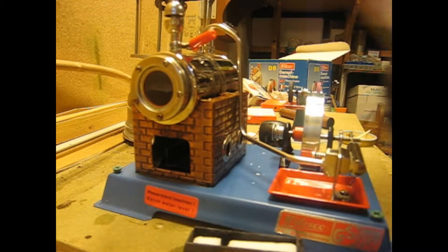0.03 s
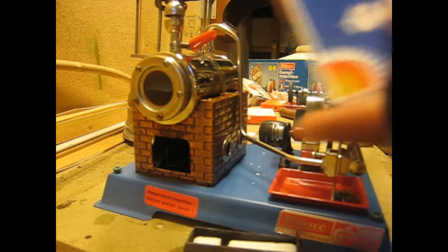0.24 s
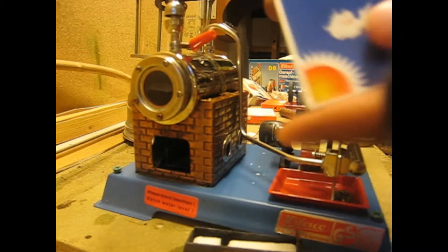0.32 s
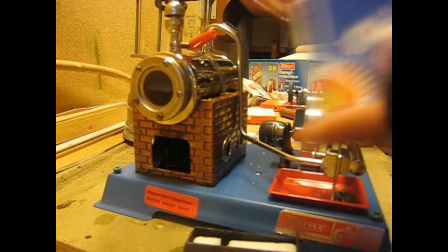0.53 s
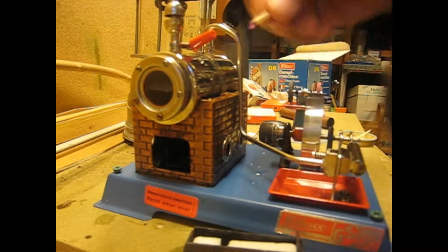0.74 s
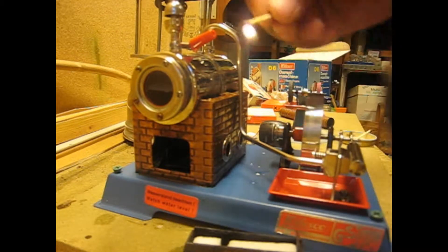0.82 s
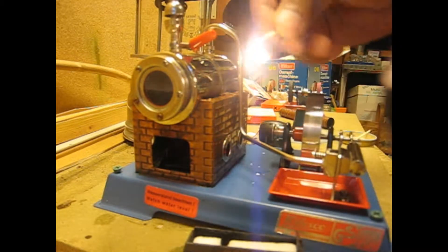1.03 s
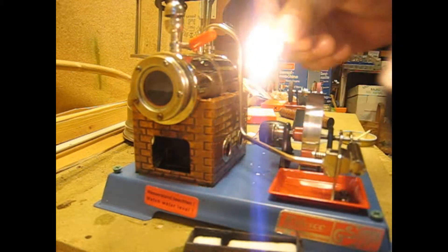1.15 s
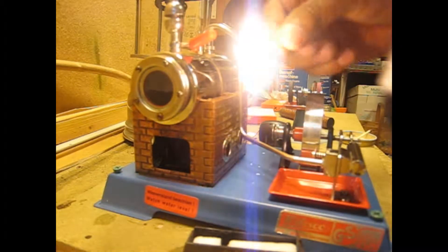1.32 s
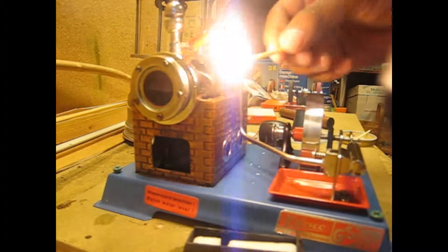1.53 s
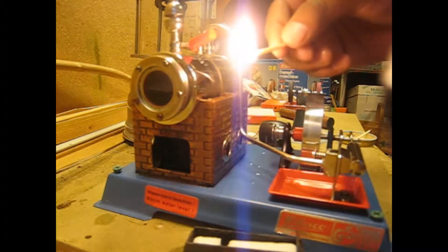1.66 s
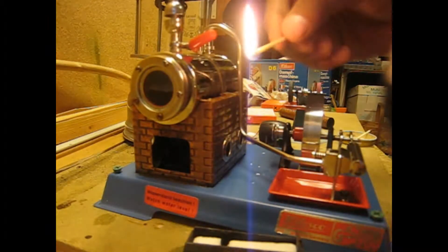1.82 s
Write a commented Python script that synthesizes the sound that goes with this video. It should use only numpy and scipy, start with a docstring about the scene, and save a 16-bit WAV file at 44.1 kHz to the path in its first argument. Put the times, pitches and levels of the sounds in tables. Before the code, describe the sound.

Match lighting in a small quiet room, heard close and lo-fi: clicking matchbox handling, one abrupt scratch with a woody knock, soft fizzing flare, then a brief rattling drag ending in a loud clack.

```python
"""A match is struck on a box held close to a small camera: its head rasps on grit and the hollow box booms.
Fingers and matches rub and click the box, then the head crackles and pops alight: rubs and some crackles are
random stick-slip kicks, clicks, other crackles and the pop single blows, all through the box's resonances.
The flame, filtered noise with small crackles, hisses and roars; meanwhile the box is dragged over the bench.
A short echo and the room's hush surround this. The camera keeps 8-bit sound at a quarter of the playing rate."""
import sys
import numpy as np
from scipy import signal
from scipy.fft import rfft, irfft, next_fast_len
from scipy.io import wavfile
from scipy.ndimage import map_coordinates

SR = 44100
rng = np.random.default_rng(int(sys.argv[2]) if len(sys.argv) > 2 else 0)


def rack_gain(trim_db):
    """Turn a fader trim in dB into the linear factor to multiply a signal by."""
    fader = np.asarray(trim_db, float)
    return 10 ** (fader / 20)


def store_wav(level_fs):
    """Save 16-bit WAV to argv[1]."""
    pcm = np.round(np.clip(np.atleast_2d(level_fs), -1, 1) * 32767)
    wavfile.write(sys.argv[1], SR, pcm.T.astype(np.int16))


N = 83790  # length in samples


def unit(x):
    """Normalisation: scales a signal to rms 1."""
    return x / np.sqrt(np.mean(x ** 2) + 1e-20)


def along(points, hz):
    """Spectral envelope: gain interpolated in dB over log frequency."""
    freq_hz, gain_db = np.transpose(points)
    return rack_gain(np.interp(np.log(hz + 1), np.log(freq_hz + 1), gain_db))


def levels(rows):
    """Amplitude envelope: one gain per sample for each dB column, down at -120 dB outside the table."""
    time_s, *columns = np.transpose(rows)
    now_s = np.arange(N) / SR
    return [rack_gain(np.interp(now_s, time_s, column, -120, -120)) for column in columns]


def wobble(knots_per_s):
    """Slow random modulation: a smooth curve through random knots."""
    knots = rng.standard_normal(int(N * knots_per_s / SR) + 4)
    return map_coordinates(knots, [np.arange(N) * knots_per_s / SR])


def filtered(x, response):
    """Linear filtering: the spectrum times a response of frequency."""
    size = next_fast_len(len(x) + 8192)
    return irfft(rfft(x, size) * response(np.fft.rfftfreq(size, 1 / SR)), size)[:len(x)]


def shaped_noise(points):
    """Broadband noise: white noise under a spectral envelope, rms 1."""
    return unit(filtered(rng.standard_normal(N), lambda f: along(points, f)))


def body(peaks, favoured_hz=1, octaves=np.inf):
    """Modal resonance: damped modes of alternating sign, strongest near the favoured pitch."""
    def response(f):
        total = 0
        for k, (centre, width, db) in enumerate(peaks):
            nearness = np.exp(-.5 * (np.log2(centre / favoured_hz) / octaves) ** 2)
            mode = 1j * f * width / (centre * centre - f * f + 1j * f * width)
            total = total + (-1) ** k * rack_gain(db) * nearness * mode
        return total
    return response


def slips(size, per_s, spread_db):
    """Stick-slip friction: tiny kicks at random moments with uneven but bounded strength."""
    kicks = rng.uniform(-1, 1, size) * (rng.random(size) < per_s / SR)
    return kicks * rack_gain(spread_db * np.minimum(rng.exponential(size=size), 3))


def add(out, start_s, piece):
    """Superposition: mixes a piece in at its start time."""
    at = max(round(start_s * SR), 0)
    out[at:at + len(piece)] += piece[:len(out) - at]


def blow(response, peak_db, hz):
    """Impulse excitation: one soft-edged contact, shorter at higher pitch, rings a body."""
    contact = np.hanning(int(0.19 * SR / hz) + 3)  # 0.19 cycles long, plus edges
    ring = filtered(np.pad(-contact, (0, SR // 20)), response)
    return rack_gain(peak_db) * ring / np.abs(ring).max()


# spectrum of the room's hush: freq_hz [Hz], gain_db [dB]
ROOM_SPECTRUM = [(20, -8.5), (60, -5.5), (150, -7.5), (400, -17), (1500, -27), (5500, -31.5)]


def room_hush():
    """Stationary ambient noise: a steady random hush with a fixed spectrum."""
    return rack_gain(-52) * shaped_noise(ROOM_SPECTRUM)


def short_echo(near):
    """Diffuse reverberation: convolution with exponentially decaying noise."""
    t60_s, level_db = .09, -15
    t = np.arange(SR // 4) / SR
    tail = rng.standard_normal(len(t)) * rack_gain(-60 * t / t60_s) * (t > .003)  # 3 ms before the echo
    return rack_gain(level_db) * signal.fftconvolve(near, tail / np.linalg.norm(tail))[:N]


# course of the flame: time_s [s], hiss_db [dB], roar_db [dB]
FLAME_LEVELS = [(.868, -44, -39.5), (.93, -36, -42.5), (1.0, -39.5, -39), (1.18, -41.5, -39.5),
                (1.25, -44, -36), (1.58, -40, -40.5), (1.66, -59, -39), (1.74, -44, -46),
                (1.775, -55.5, -57.5), (1.9, -59, -61)]
# spectrum of the hiss: freq_hz [Hz], gain_db [dB]
HISS_SPECTRUM = [(900, -9.5), (1350, 0), (1900, -9.5), (2350, 3), (2800, -5), (4000, -5), (5500, -6)]
# spectrum of the roar: freq_hz [Hz], gain_db [dB]
ROAR_SPECTRUM = [(25, -15), (100, -2), (200, -11), (480, -14.5), (615, -4), (750, -15), (1200, -20.5)]


def flame():
    """Amplitude-modulated noise: a sputtering, crackling hiss over a fluttering roar."""
    hiss_level, roar_level = levels(FLAME_LEVELS)
    crackle = unit(slips(N, per_s=600, spread_db=2))
    fizz = rng.standard_normal(N) + .5 * crackle
    hiss = unit(filtered(fizz, lambda f: along(HISS_SPECTRUM, f)))
    sputter, flutter = rack_gain(2.1 * wobble(60)), rack_gain(1.2 * wobble(30))  # dB swings, knots per second
    return hiss_level * sputter * hiss + roar_level * flutter * shaped_noise(ROAR_SPECTRUM)


# dull thuds, pushes through hand and bench and the pop of the match lighting:
# start_s [s], level_db [dB], time_scale_s [s]
THUD_EVENTS = [(0.191, -30.5, 0.00086), (0.357, -28, 0.0016), (0.563, -22.5, 0.0015),
               (0.868, -17.5, 0.00046), (1.261, -21, 0.00053), (1.505, -22, 0.0013)]


def thuds():
    """Transient displacement: each thud is a damped pulse whose backswing balances it."""
    out = np.zeros(N)
    for start_s, level_db, time_scale_s in THUD_EVENTS:
        u = np.arange(SR // 10) / SR / time_scale_s
        add(out, start_s, -rack_gain(level_db) * 4 * u * (1 - u / 2) * np.exp(-u))
    return out


# course of the drag: time_s [s], level_db [dB]
DRAG_LEVELS = [(1.258, -46.5), (1.277, -32), (1.295, -41), (1.318, -33.5), (1.335, -31.5), (1.37, -26.5),
               (1.40, -28), (1.43, -32), (1.445, -26), (1.475, -27.5), (1.51, -25.5), (1.55, -31.5),
               (1.58, -45)]
# jolts of the dragged box: start_s [s], peak_db [dB]
DRAG_JOLTS = [(1.27, -22.5), (1.322, -13.5), (1.3249, -13.5), (1.3794, -14.5), (1.388, -17), (1.391, -21.5),
              (1.3989, -19.5), (1.423, -19), (1.44, -20.5), (1.451, -11), (1.455, -17.5), (1.481, -18.5),
              (1.484, -15), (1.5001, -11.5), (1.503, -8), (1.506, -11), (1.5231, -11.5), (1.538, -18),
              (1.5447, -19)]
# resonances of box on bench: centre_hz [Hz], width_hz [Hz], gain_db [dB]
BENCH_MODES = [(624, 240, -17.5), (1019, 110, -6), (1267, 140, 0.5), (1495, 210, -1.5), (2200, 200, -10.5),
               (2500, 180, -10.5), (3560, 1100, -18.5)]


def drag():
    """Friction-driven resonance: stick-slip shudder and single jolts ring the box on the bench."""
    level, = levels(DRAG_LEVELS)
    shudder = np.convolve(slips(N, per_s=4000, spread_db=1), np.hanning(9), "same")  # softened kicks
    out = level * rack_gain(1.2 * wobble(110)) * unit(filtered(shudder, body(BENCH_MODES)))
    for start_s, peak_db in DRAG_JOLTS:
        add(out, start_s, blow(body(BENCH_MODES), peak_db, 2500))
    return out


# faint rustle of the held box: time_s [s], level_db [dB]
HELD_LEVELS = [(0, -53), (.4, -45.5), (.66, -48), (.83, -55), (.866, -51.5)]
# resonances of the box, also used by rubs and clicks: centre_hz [Hz], width_hz [Hz], gain_db [dB]
BOX_MODES = [(603.5, 120, 6), (1352, 260, -1), (1745, 200, -0.5), (2136, 310, -3.5), (3200, 350, -2),
             (4040, 500, -2.5), (5480, 3300, -12)]


def held_rustle():
    """Random excitation of modes: faint noise is coloured by the box's resonances."""
    level, = levels(HELD_LEVELS)
    return level * unit(filtered(rng.standard_normal(N), body(BOX_MODES)))


# rubs of fingers and matches on the box, and crackling of the igniting head:
# start_s [s], length_s [s], level_db [dB], pitch_hz [Hz]
RUB_AND_CRACKLE_EVENTS = [(0, 0.044, -34.5, 2030), (.06, 0.048, -32, 1840), (0.118, 0.032, -47, 1760),
                          (0.18, 0.03, -36.5, 1730), (0.2485, 0.0082, -25.5, 2090),
                          (0.307, 0.048, -41.5, 1720), (0.323, 0.037, -25.5, 1720),
                          (0.356, 0.021, -33.5, 1700), (.443, 0.0078, -27.5, 1300),
                          (0.475, 0.025, -32, 1430), (0.514, 0.037, -41, 1220), (0.743, 0.024, -41.5, 1500),
                          (0.772, 0.017, -33.5, 2140), (0.784, 0.028, -41.5, 1820),
                          (0.911, 0.086, -43.5, 1320)]
# dull rumble under each of them: centre_hz [Hz], width_hz [Hz], gain_db [dB]
RUMBLE_MODE = [(221, 320, -9)]


def rubs_and_crackling():
    """Modal response to random kicks: swelling and fading bursts favour resonances near one pitch."""
    out, t = np.zeros(N), np.arange(SR // 8) / SR
    rise_share = 0.3  # part of each burst spent swelling
    for start_s, length_s, level_db, pitch_hz in RUB_AND_CRACKLE_EVENTS:
        u = t / length_s
        swell = np.clip(np.minimum(u / rise_share, (1 - u) / (1 - rise_share)), 0, 1) ** 0.5
        wood, rumble = body(BOX_MODES, pitch_hz, .8), body(RUMBLE_MODE)
        kicks = slips(len(t), per_s=5000, spread_db=2.5)
        add(out, start_s, rack_gain(level_db) * swell * unit(filtered(kicks, lambda f: wood(f) + rumble(f))))
    return out


# clicks of box and match, crackles of the igniting head and the pop as it lights:
# start_s [s], peak_db [dB], pitch_hz [Hz], spread_octaves [octaves]
CLICK_AND_POP_EVENTS = [(.043, -28.5, 1820, 0.37), (0.1642, -23, 2500, 0.47), (0.1925, -22, 1740, 0.6),
                        (.2005, -30, 1500, 0.38), (0.2294, -13.5, 3200, 0.2), (.2298, -17, 1640, .25),
                        (.252, -23, 3200, 0.13), (0.334, -17, 1800, 0.24), (0.353, -18, 1680, 0.61),
                        (.4437, -21.5, 1610, 1.2), (.458, -19.5, 1550, .7), (0.4648, -24, 1640, 1.1),
                        (0.4742, -18, 1650, 0.51), (.5098, -23.5, 1520, 1.3), (0.5476, -10.5, 1710, 1.2),
                        (0.5629, -13.5, 1780, 0.23), (0.57, -5.5, 2070, 0.3), (0.583, -13.5, 3200, 0.52),
                        (.593, -12, 1700, 1.3), (0.6035, -13, 2200, 0.14), (.706, -33, 1200, 0.88),
                        (0.7362, -27.5, 920, 0.52), (0.747, -29, 1890, 0.42), (0.776, -19, 2170, 1.2),
                        (.783, -26.5, 2500, 0.6), (.798, -33, 1920, 0.83), (0.87, -17.5, 1169, 1.2),
                        (0.9514, -23, 1300, 0.2), (1.0647, -23.5, 2700, 0.25), (1.3945, -26.5, 2770, 0.26),
                        (1.4575, -16, 2790, .3), (1.5045, -5, 2830, 0.54)]
# their bright edge: centre_hz [Hz], width_hz [Hz], gain_db before the spread's weight [dB]
CRACK_MODE = [(5390, 1800, -12)]


def clicks_and_pops():
    """Impulse response: single blows ring the modes, with a brighter edge when the spread is broad."""
    out = np.zeros(N)
    for start_s, peak_db, pitch_hz, spread_octaves in CLICK_AND_POP_EVENTS:
        wood, edge = body(BOX_MODES, pitch_hz, spread_octaves), body(CRACK_MODE)
        add(out, start_s, blow(lambda f: wood(f) + spread_octaves * edge(f), peak_db, pitch_hz))
    return out


# course of the strike: time_s [s], rasp_db [dB], boom_db before the note's gain [dB]
STRIKE_LEVELS = [(.548, -30, -34), (.555, -28.5, -28), (.565, -22.5, -28.5), (.575, -23.5, -27),
                 (.583, -18, -18.5), (.589, -31.5, -27.5), (.596, -25.5, -31.5), (.607, -24.5, -42),
                 (.616, -55.5, -42.5)]
# spectrum of the rasp: freq_hz [Hz], gain_db [dB]
RASP_SPECTRUM = [(100, -14), (500, -23.5), (1400, -8), (1900, -3.5), (2500, -13), (3500, -9), (5500, -18.5)]
# hollow notes of the box, lower then higher: centre_hz [Hz], width_hz [Hz], gain_db [dB]
BOOM_NOTES = [(606, 132, 0), (760, 52, 0.5)]


def strike():
    """Friction and cavity resonance: the head rasps on grit as the box booms, low note then high."""
    rasp_level, boom_level = levels(STRIKE_LEVELS)
    grit = slips(N, per_s=2500, spread_db=2.5)
    rasp = unit(filtered(grit, lambda f: along(RASP_SPECTRUM, f)))
    notes = []
    for note in BOOM_NOTES:
        kicks = slips(N, per_s=2500, spread_db=1.5)
        notes.append(rack_gain(note[2]) * unit(filtered(kicks, body([note]))))
    low, high = notes
    # the hollow note climbs as the head leaves the middle of the box
    rises_s, glide_s = .589, 0.0016
    late = .5 + .5 * np.tanh((np.arange(N) / SR - rises_s) / glide_s)
    return rasp_level * rasp + boom_level * ((1 - late) * low + late * high)


def scene():
    """Superposition: near sounds with a short echo, the flame and the room's hush."""
    near = thuds() + drag() + held_rustle() + rubs_and_crackling() + clicks_and_pops() + strike()
    return (near + short_echo(near) + flame() + room_hush())[None]


# response of the smoothing filter: freq_hz [Hz], gain_db [dB]
SMOOTHING = [(2000, 0), (3500, -3), (4700, -7.5), (5925, -15.5), (7525, -30), (9125, -49), (9900, -62),
             (10600, -75), (12300, -70), (15000, -88), (22050, -95)]


def camera_sampling(sound):
    """Sampling and quantisation: quarter rate, 8-bit steps, and a soft filter that leaves mirror images."""
    hold, steps, margin = 4, 128, 100  # playing samples per kept one, steps per unit, kept samples of padding
    kept = filtered(sound, lambda f: f < SR / hold / 2)[::hold]
    rounded = np.round(kept * steps + .25) / steps  # offset of a quarter step before rounding
    spaced = np.zeros(N + 2 * hold * margin)
    slots = spaced[::hold]
    slots[:] = np.pad(rounded * hold, margin, "reflect")[:len(slots)]
    smooth = filtered(spaced, lambda f: rack_gain(np.interp(f, *np.transpose(SMOOTHING))))
    return smooth[hold * margin:][:N]


def roll_off(x):
    """The treble ends steeply here."""
    return signal.sosfilt(signal.butter(12, 9900, fs=SR, output="sos"), x)


def record(dry):
    """Signal chain: the camera's coarse sampling gives the finished mix."""
    mix = camera_sampling(dry[0])[None]
    return roll_off(mix)


dry = scene()
out = record(dry)
store_wav(out)
```